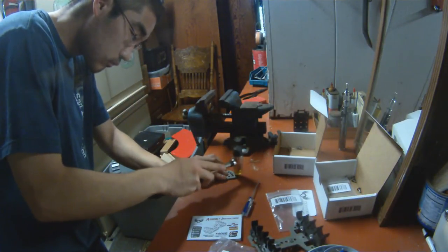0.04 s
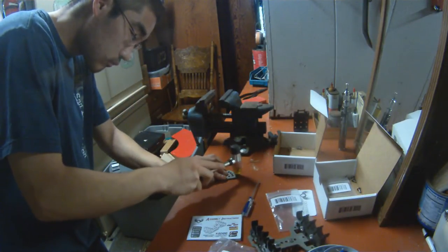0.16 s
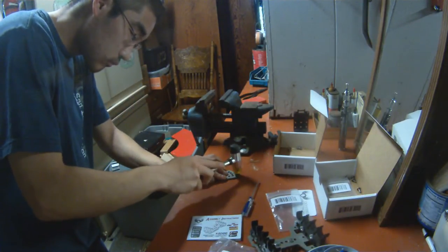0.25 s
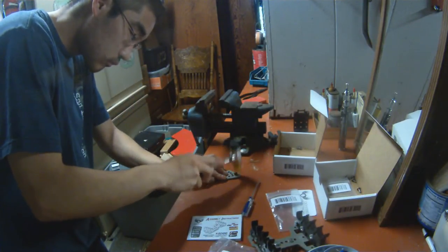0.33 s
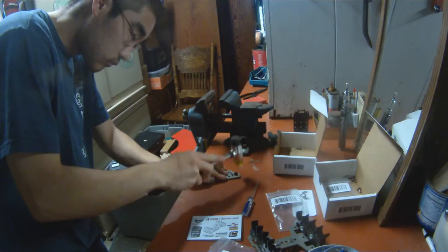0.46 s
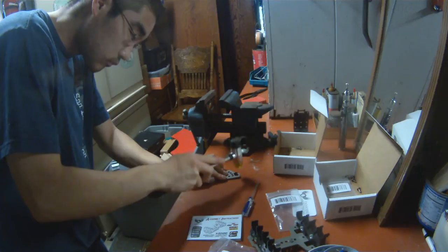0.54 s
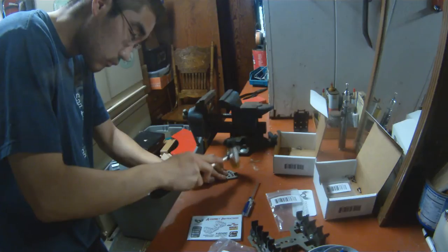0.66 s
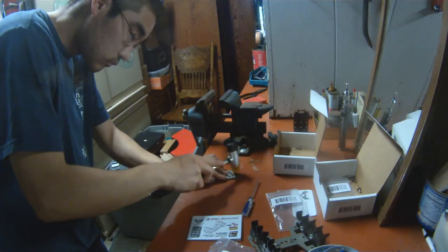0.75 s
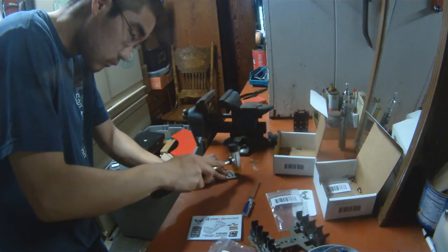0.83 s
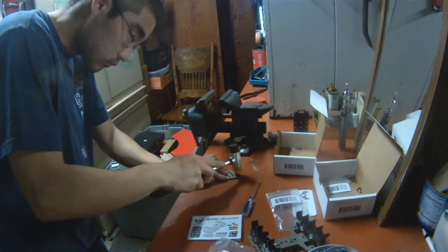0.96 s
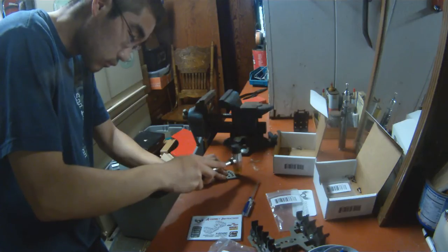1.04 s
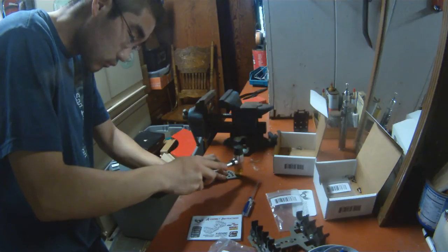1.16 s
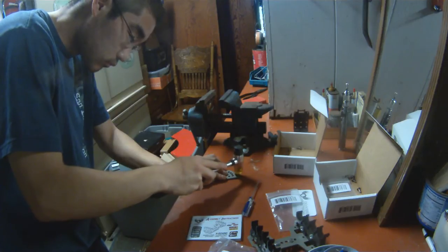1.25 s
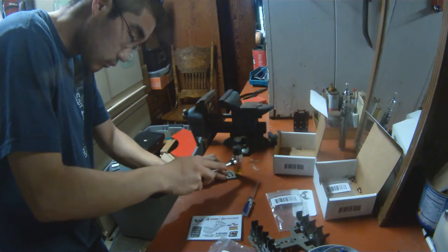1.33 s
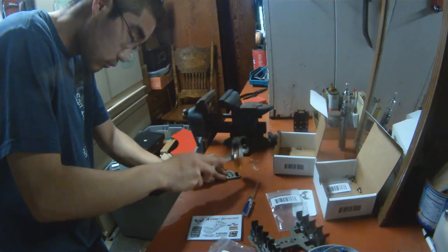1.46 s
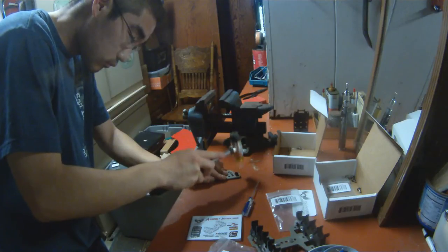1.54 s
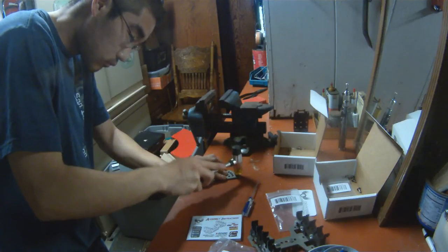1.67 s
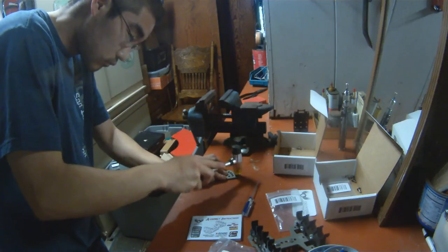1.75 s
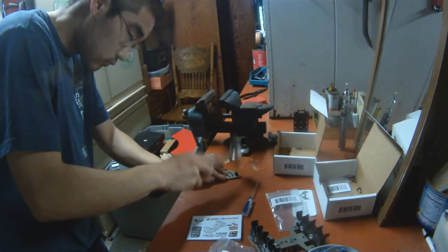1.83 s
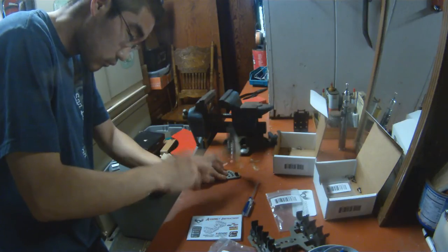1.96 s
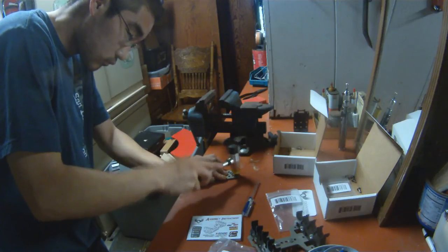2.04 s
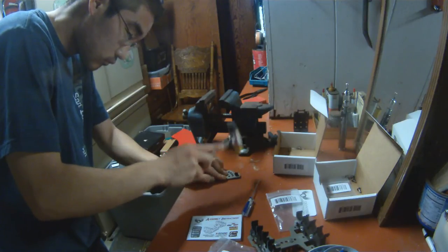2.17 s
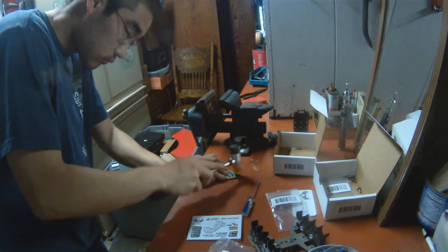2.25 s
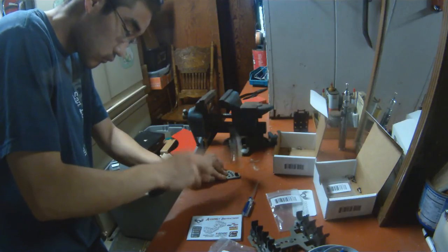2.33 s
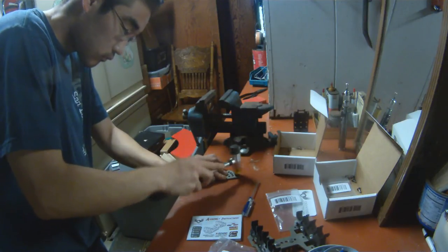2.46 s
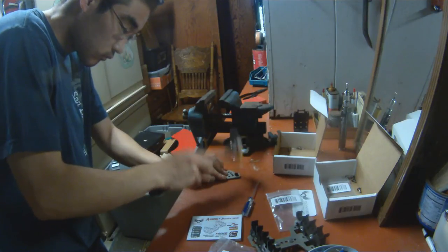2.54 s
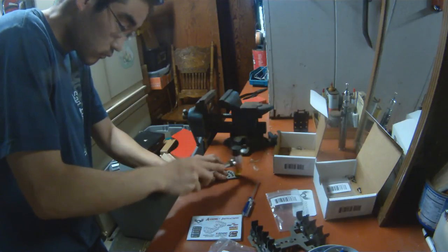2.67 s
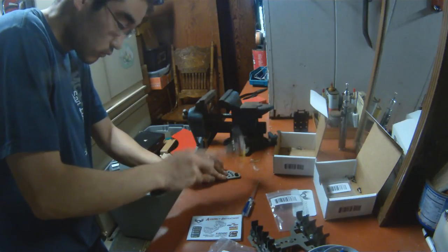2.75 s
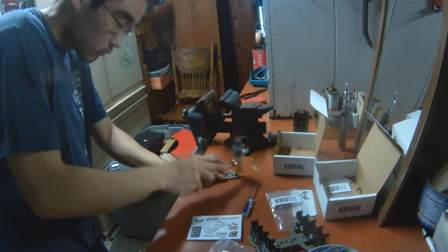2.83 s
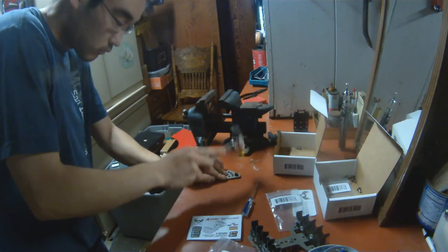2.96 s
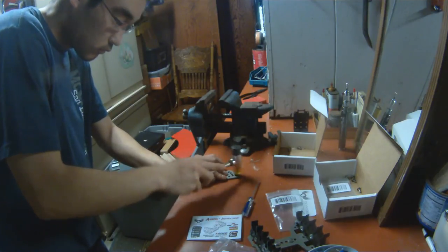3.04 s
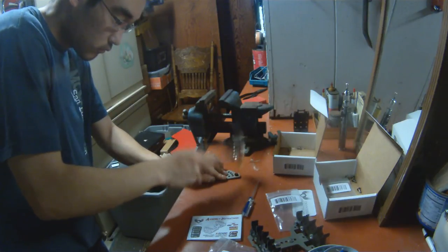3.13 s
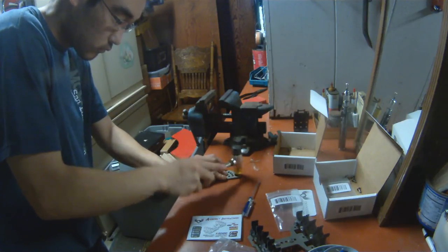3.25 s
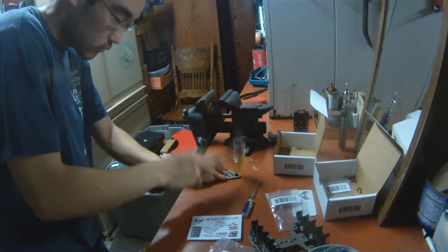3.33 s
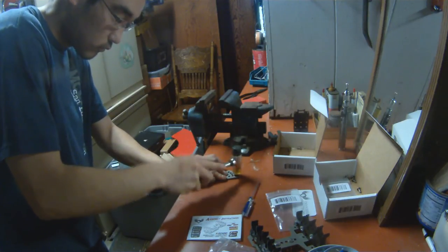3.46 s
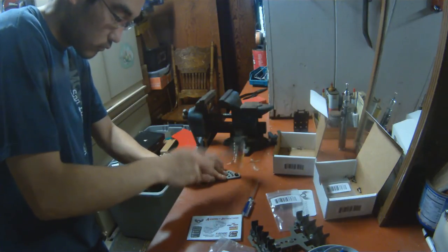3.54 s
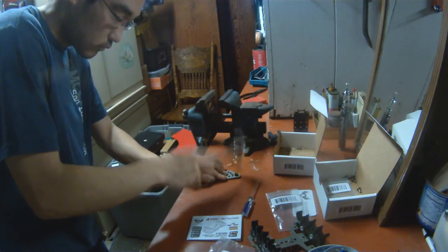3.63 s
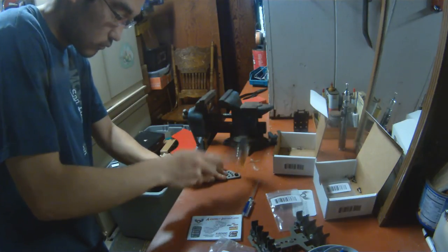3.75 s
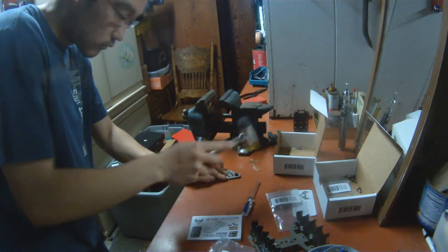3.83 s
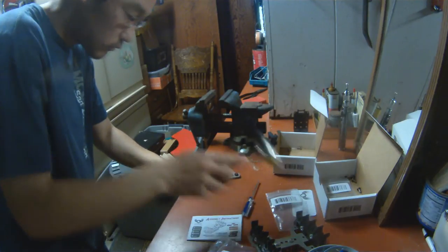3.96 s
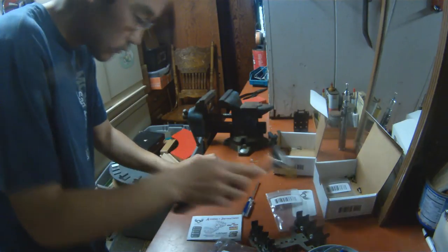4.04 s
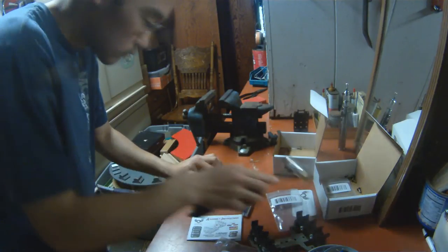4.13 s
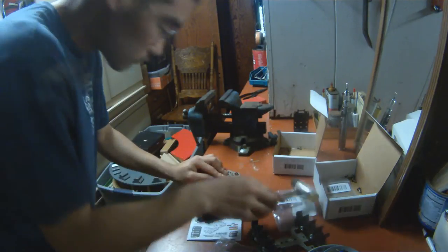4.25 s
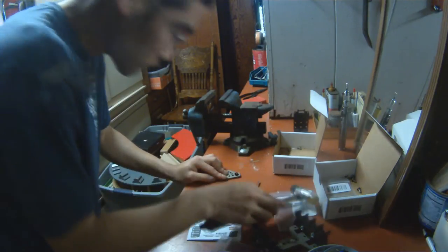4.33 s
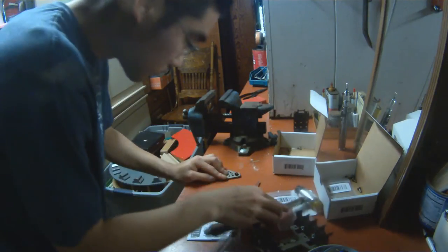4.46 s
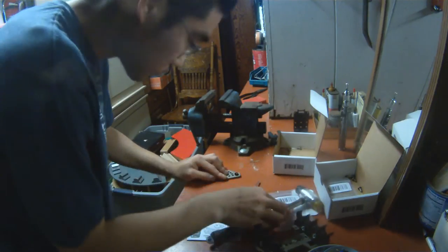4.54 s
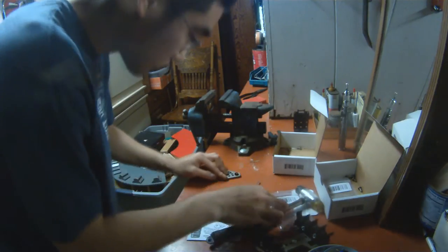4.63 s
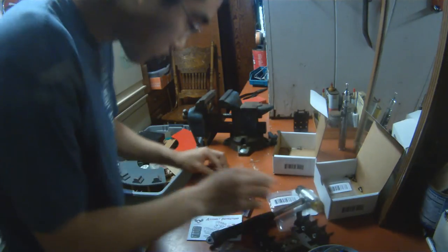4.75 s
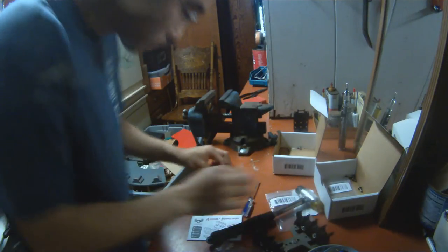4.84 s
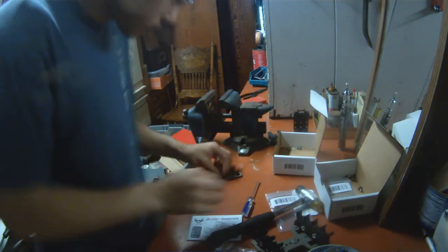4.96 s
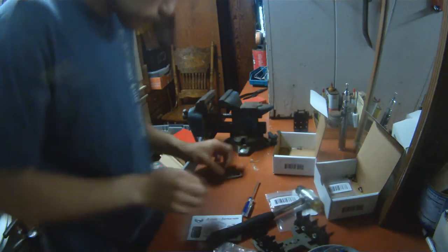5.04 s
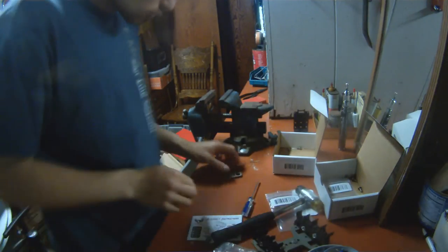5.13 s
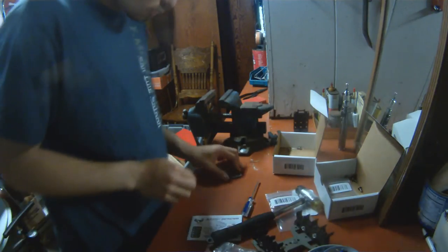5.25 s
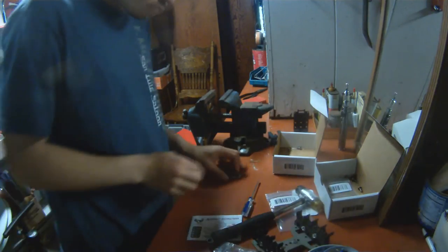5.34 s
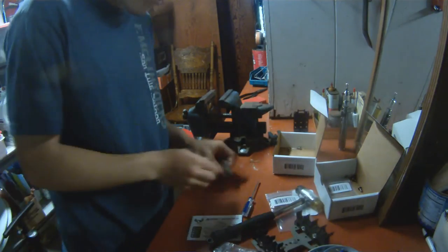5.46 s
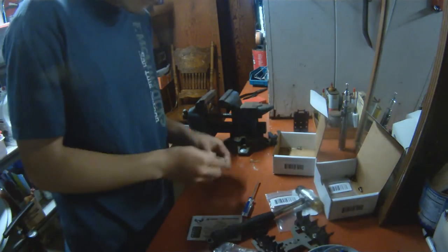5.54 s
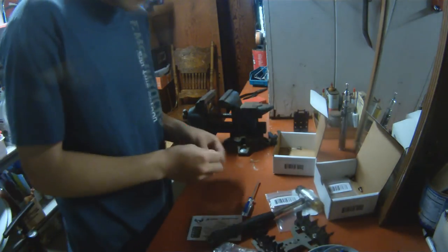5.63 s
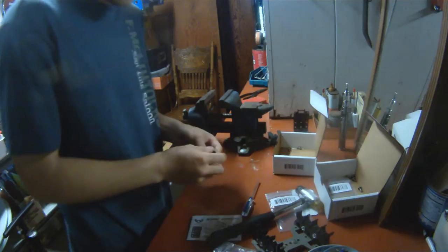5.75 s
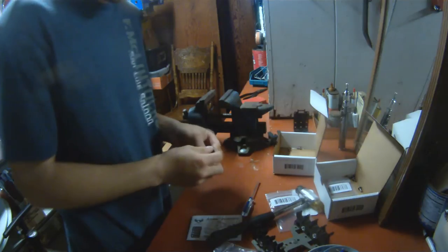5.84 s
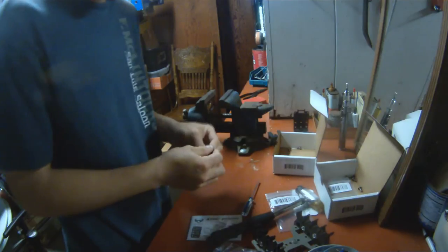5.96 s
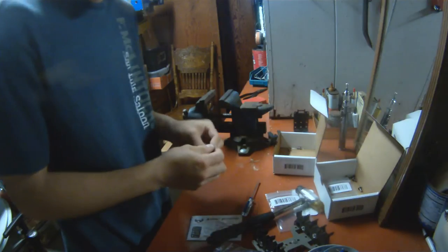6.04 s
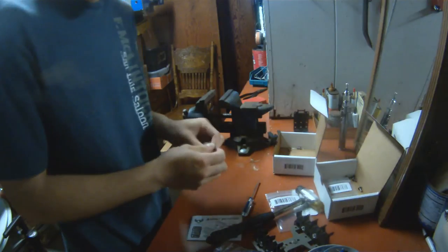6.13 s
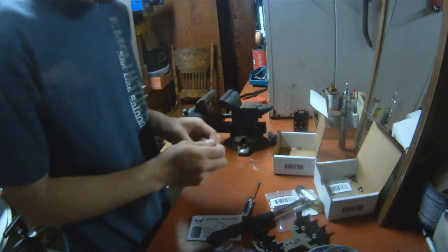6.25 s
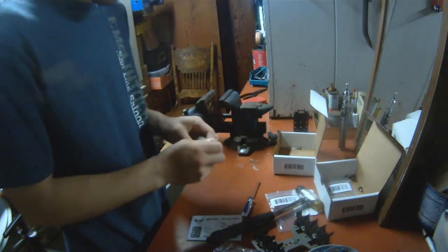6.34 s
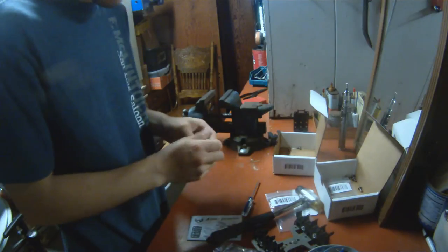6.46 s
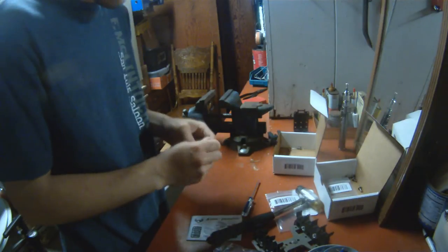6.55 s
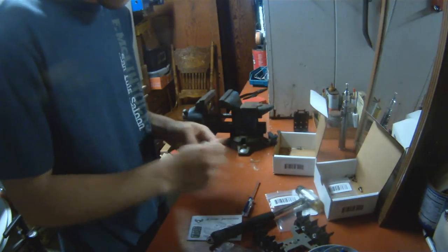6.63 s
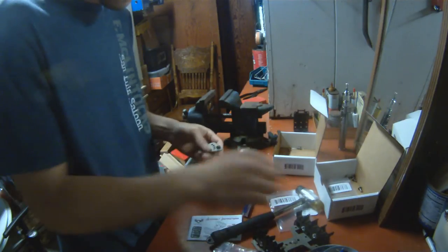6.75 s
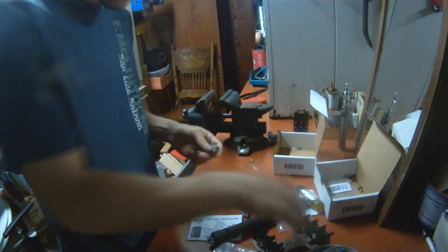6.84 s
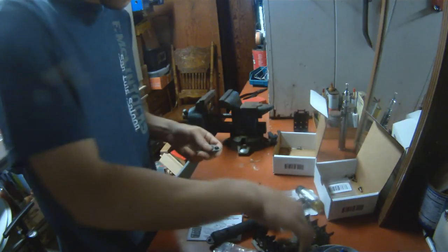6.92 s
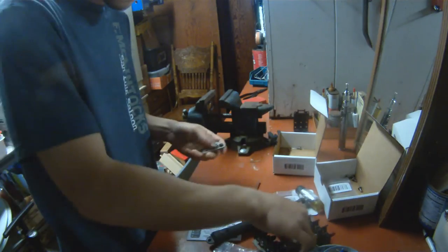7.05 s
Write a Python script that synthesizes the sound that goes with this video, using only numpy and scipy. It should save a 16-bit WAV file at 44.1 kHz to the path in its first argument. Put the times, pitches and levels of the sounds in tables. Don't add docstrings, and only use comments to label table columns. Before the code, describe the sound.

In a small, dry workshop with steady soft hiss, faint bench touches lead to two hard single hammer knocks, then a quick even run of eight. The woody thuds grow clackier as the plastic part seats. A low steel hum lingers while the hammer scrapes and bounces down on the bench, then tiny clicks in the hands and a light metal tool tap. Close stereo microphone, almost centred.

```python
import sys
import numpy as np
from scipy import signal
from scipy.fft import rfft, irfft, next_fast_len
from scipy.io import wavfile
from scipy.ndimage import uniform_filter1d

SR = 44100
rng = np.random.default_rng(int(sys.argv[2]) if len(sys.argv) > 2 else 0)


def attenuation_scalar(level_db):
    decades = np.asarray(level_db, float) / 20
    return 10 ** decades


def unload_audio(sound):
    columns = np.transpose(np.atleast_2d(sound))
    steps = np.round(np.clip(columns, -1, 1) * 32767)
    wavfile.write(sys.argv[1], SR, steps.astype(np.int16))


N = 312662

# frequency in Hz, level in dB per Hz.
AIR_SPECTRUM = [(20, -30), (50, -11), (120, -8.5), (200, -4.5), (400, -6), (700, -7), (1500, -9.5),
                (5000, -14), (15300, -20), (15500, -60)]
# frequency in Hz, level in dB per Hz.
PORT_SPECTRUM = [(12, -66.5), (20, -39), (217, -10), (377, -9), (421, -11), (511, -8.0), (1590, -9.0),
                 (15000, -12.0), (15400, -50.5)]
HISS_DB, LIMIT_DB, DUCK_DB_PER_DB, DUCK_S = -61.5, -7.5, 0.4463, 0.08
RUMBLE_DB, RUMBLE_FADE_DB_PER_S = -70, 1.1
QUIET_S, QUIET_FADE_DB_PER_S = 4.5, 2.5

# frequency in Hz, t60 in s.
ROOM_T60 = [(100, .4), (400, 0.2), (1100, 0.25), (3000, 0.17), (8000, 0.12), (15000, 0.097)]

# frequency in Hz, width in Hz, level in dB.
HANDLE_MODES = [(269, 120, -5), (410, 89, -5.5), (595, 47, -4.5), (970, 154, -14.5), (1160, 103, -17),
                (1790, 570, -21.5)]
SLIDE_S, SLIDE_DB = 4.36, -46.5
SLIDE_ATTACK_S, SLIDE_HOLD_S, SLIDE_T60_S = 0.031, 0.012, 0.17

# start in seconds, peak in dB, t60 in s.
CLICKS = [
    (5.087, -60, .065),
    (5.335, -60, .04),
    (5.455, -56.5, .08),
]
# frequency in Hz, level in dB, delay in s.
CLICK_TONES = [
    [(12400, -1, 0.00065), (7500, -2, .005), (3434, -0.5, 0), (1057, 3, 0.0033)],
    [(12500, -4, 0), (9100, -4, 0), (5460, -1, .001), (3494, -2, .001), (1480, 4.5, 0.0032)],
    [(1470, 4.5, 0), (7460, -1.5, .01), (4927, -10, .015)],
]
RISE_PER_T60 = 0.058
# frequency in Hz, level in dB, t60 in s, delay in s.
TOOL_MODES = [(1646, 0, 0.048, 0), (3784, -8, .18, .004), (2610, -8, .078, .004), (5330, -17, .11, .012),
              (1640, -12.5, .09, .023)]
TOOL_S, TOOL_DB = 7.039, -48.5
# start in seconds, peak in dB, rise in s, t60 in s, frequency in Hz.
TOOL_KNOCK = (7.047, -42, 0.0012, 0.09, 283)

# frequency in Hz, level in dB, t60 in s.
FRAME_MODES = [(96, 2, 4.64), (213, -9.5, 6.8)]
HUM_DB, HUM_DB_PER_CLACK_DB = -55, 0.7

# frequency in Hz, level in dB, t60 in s.
BENCH_MODES = [(84, -23, 0.22), (136, -7.5, 0.24), (163.2, 5, 0.27), (233, -10.5, .2), (281, -7.5, 0.17),
               (343, -5, 0.15), (369.9, 3, 0.18), (420, -5, 0.22), (511, -6, 0.21), (538, -1.5, 0.12),
               (596.2, 4.5, 0.21), (666, 2.5, 0.27), (737, -5.5, 0.19), (785, -2.5, .15), (929, -0.5, .15),
               (994.3, 2.5, 0.15), (979, -2.5, 0.13), (1125, 0, 0.098), (1030, -14.5, .13), (1253, -4, 0.1),
               (1342.5, -0.5, 0.073), (1476, -2.5, .13), (1679, -3.5, .12), (1715, -15.5, 0.078),
               (1800, -20, .12), (2024, -22, .12), (2180, -27.5, 0.075), (2330, -40, 0.033)]
# frequency in Hz, level in dB per Hz.
GRAIN_SPECTRUM = [(120, -39.5), (300, 0), (500, 1.5), (1000, -3.5), (1500, -13.5), (2200, -42)]
ZONES_HZ = [140, 480, 1150, 2100]
# frequency in Hz, level in dB, t60 in s.
DENT_MODES = [(480, 0, .014), (1000, 0, .009)]
# frequency in Hz, t60 in s.
CARTON = (499, .27)
# frequency in Hz, level in dB, t60 in s.
HEAD_MODES = [(4400, 0, .014), (5660, -7, .01), (6590, -6, .01), (7600, -5, .016), (10800, -12, .008),
              (12700, -11, .008)]
# frequency in Hz, level in dB per Hz.
CRACK_SPECTRUM = [(1500, -38), (3000, -11), (4400, -7.5), (6200, -17.5), (8000, -12.5), (13000, -18),
                  (15300, -26), (16400, -69)]
# frequency in Hz, level in dB per Hz.
PLASTIC_SPECTRUM = [(900, -39.5), (1500, -2), (2000, 8.5), (2600, -6.5), (3500, -13.5), (5000, -40)]
# frequency in Hz, level in dB per Hz.
CLATTER_SPECTRUM = [(120, -30), (200, -2), (414, -8), (681, 3.5), (834, -12), (941, -0.5), (1350, -14),
                    (2110, -8), (2920, -31.5), (5000, -30), (6500, -54), (11000, -120)]
TRAVEL_S = 0.001

# start in seconds, peak in dB, clack in dB, sharpness in dB.
TOUCHES = [
    (0.001, -48.5, -22, -22),
    (0.824, -40, -14.5, -7.5),
    (1.147, -55.5, -14, -17),
    (7.046, -46.5, -6, -16),
]
TOUCH_THUD_DB = 4.5
# start in seconds, peak in dB, clack in dB, sharpness in dB.
SETTLES = [
    (4.452, -41, -10, -22),
    (4.612, -24, -13.5, -40.5),
    (4.62, -28, -19, -45),
    (4.626, -32.5, -23, -37),
]
SETTLE_THUD_DB = -10
# start in seconds, peak in dB, thud in dB, clack in dB, edge in dB.
BOUNCES = [
    (4.463, -19, -25, -4, -0.5),
    (4.48, -18.5, -30, -6, -5.5),
    (4.49, -31, -2, -10.5, -13),
    (4.555, -19, -32, 0, -6),
    (4.566, -25, -29, -8, -3.5),
    (4.581, -23.5, -9, -11, -10),
]
BOUNCE_CRACK_DB, CRACK_DB_PER_THUD_DB = -31, -0.32
# start in seconds, peak in dB, then relative to the peak clack in dB
# (grows as the part seats), crack of the face in dB, ring of the head in dB.
BLOWS = [
    (1.725, -7, -10.5, -25, -29),
    (2.07, -3.5, -8.5, -26.5, -22),
    (2.322, -4.5, -3.5, -28.5, -27),
    (2.524, -5, -8.5, -23, -21),
    (2.722, -8, -8.5, -20, -37),
    (2.916, -4.5, -10, -22, -19),
    (3.11, -4, -2, -18.5, -21),
    (3.323, -6.5, 1.5, -25.5, -20),
    (3.529, -8, 1, -19.5, -15.5),
    (3.729, -6.5, -1, -22.5, -19.5),
]
THUD_DB, THUD_DB_PER_CLACK_DB = -21, -0.5
SLIP_S, SLIP_SPAN_S, SLIP_DB, TIGHT_DB = 2.5, 0.28, 20.5, -30


def unit(x):
    return x / np.sqrt(np.mean(x ** 2) + 1e-20)


def along(points, hz):
    f, v = np.transpose(points)
    return np.interp(np.log(hz + 1), np.log(f + 1), v)


def filtered(x, response):
    m = next_fast_len(len(x) + 8192)
    return irfft(rfft(x, m) * response(np.fft.rfftfreq(m, 1 / SR)), m)[:len(x)]


def coloured(points, size):
    return unit(filtered(rng.standard_normal(size), lambda hz: attenuation_scalar(along(points, hz))))


def add(track, s, sound):
    spot = track[round(s * SR):][:len(sound)]
    spot += sound[:len(spot)]


def sine(hz, t):
    return np.sin(2 * np.pi * hz * t)


def rise(t, rise_s):
    return 1 - np.exp(-t / rise_s)


def decay(t, t60_s):
    return attenuation_scalar(-60 * t / t60_s)


def floor():
    t = np.arange(N) / SR
    shared = attenuation_scalar(3.5) * coloured(AIR_SPECTRUM, N)
    apart = attenuation_scalar(-5.5) * coloured(PORT_SPECTRUM, N)
    low = coloured([(20, -31.5), (60, -12.5), (130, -1.0), (300, -5.5), (800, -14), (3000, -46.0)], N)
    duck_db = 0
    for s, db, *_ in BLOWS:
        duck_db = duck_db + DUCK_DB_PER_DB * max(db - LIMIT_DB, 0) * np.clip((t - s) / DUCK_S, 0, 1)
    rumble_db = RUMBLE_DB - RUMBLE_FADE_DB_PER_S * t - QUIET_FADE_DB_PER_S * np.clip(t - QUIET_S, 0, None)
    hiss = np.array([shared + apart, shared - apart]) * attenuation_scalar([[-0.15], [0.15]])
    return attenuation_scalar(HISS_DB - duck_db) * hiss + attenuation_scalar(rumble_db) * low


def room_tail():
    hz, t, z = signal.stft(rng.standard_normal(SR // 2), SR, nperseg=256)
    x = signal.istft(z * decay(t, along(ROOM_T60, hz)[:, None]), SR, nperseg=256)[1]
    return x / np.linalg.norm(x)


def scrape():
    noise = rng.standard_normal(N)
    swell = unit(uniform_filter1d(rng.standard_normal(N), size=90))
    grains = noise * attenuation_scalar(2.5 * swell)

    def handle(f):
        total = 0
        for k, (hz, width_hz, db) in enumerate(HANDLE_MODES):
            damping = 1j * f * width_hz
            total = total + (-1) ** k * attenuation_scalar(db) * damping / (hz * hz - f * f + damping)
        return total

    t = np.arange(N) / SR - SLIDE_S
    attack = np.clip(t / SLIDE_ATTACK_S, 0, 1)
    after_s = np.clip(t - SLIDE_ATTACK_S - SLIDE_HOLD_S, 0, None)
    return attack * attenuation_scalar(SLIDE_DB) * decay(after_s, SLIDE_T60_S) * unit(filtered(grains, handle))


def rub(rows, drift_rad, puff_db):
    out, t = np.zeros(N), np.arange(SR // 4) / SR
    for s, db, rise_s, t60_s, hz in rows:
        drift = np.cumsum(rng.standard_normal(len(t))) * drift_rad
        spectrum = [(hz / 3, -20), (hz, 0), (hz * 2.6, -14), (hz * 5, -40)]
        puff = attenuation_scalar(puff_db) * coloured(spectrum, len(t))
        tone = np.sin(2 * np.pi * hz * t + drift)
        add(out, s, attenuation_scalar(db + 2.5) * decay(t, t60_s) * rise(t, rise_s) * (tone + puff))
    return out


def hand_clicks():
    rows = []
    for (s, db, t60_s), tones in zip(CLICKS, CLICK_TONES):
        rows += [(s + late_s, db + g, RISE_PER_T60 * t60_s, t60_s, hz) for hz, g, late_s in tones]
    return rub(rows, drift_rad=0.05, puff_db=-2)


def steel_tool():
    rows = [(TOOL_S + late_s, TOOL_DB + g, RISE_PER_T60 * t60_s, t60_s, hz)
            for hz, g, t60_s, late_s in TOOL_MODES]
    return rub(rows + [TOOL_KNOCK], drift_rad=0.01, puff_db=-18)


def frame_hum():
    t = np.arange(N) / SR
    s, _, clack = np.transpose(BLOWS)[:3]
    db = HUM_DB + HUM_DB_PER_CLACK_DB * clack
    last = np.clip(np.searchsorted(s, t) - 1, 0, None)
    out = 0
    for hz, level, t60_s in FRAME_MODES:
        gain = (t > s[0]) * attenuation_scalar(db[last] + level) * decay(t - s[last], t60_s)
        out = out + uniform_filter1d(gain, size=400) * np.sqrt(2) * sine(hz, t)
    return out


def bench_body(t, thud, clack, edge, press_db, press_s, scatter_db):
    hz, level, t60_s = np.transpose(BENCH_MODES)[..., None]
    sign = -(-1) ** (np.arange(len(hz))[:, None] // 3)
    t60_s = np.minimum(t60_s, np.where(hz > 560, 0.18, 0.25))
    colour = along(np.transpose([ZONES_HZ, [thud + 12, 0, clack + 3, edge + 18]]), hz)
    gains = attenuation_scalar(level + colour + scatter_db * rng.standard_normal(hz.shape))
    wander = 0.002 * np.sqrt(hz) * np.cumsum(rng.standard_normal((len(hz), len(t))), axis=1)
    press = np.exp(-(t / press_s) ** 2)
    fade = decay(t, t60_s) + attenuation_scalar(press_db) * press
    modes = np.sum(sign * gains * fade * np.sin(2 * np.pi * hz * t + wander), axis=0)
    tilted = [(f, g + (f > 800) * clack) for f, g in GRAIN_SPECTRUM]
    grain = coloured(tilted, len(t)) * (decay(t, 0.2) + attenuation_scalar(press_db - 7) * press)
    return modes * rise(t, 0.0025) + attenuation_scalar(3.5) * grain * rise(t, 0.002)


def post_dent(t, clack):
    dent = -sum(attenuation_scalar(g + (f > 800) * clack) * decay(t, t60_s) * sine(f, t) for f, g, t60_s in DENT_MODES)
    return dent * rise(t, 0.0002)


def carton(t):
    hz, t60_s = CARTON
    return decay(t, t60_s) * sine(hz, t) * rise(t, 0.009)


def part_chatter(t, spectrum):
    return coloured(spectrum, len(t)) * (decay(t, 0.037) + attenuation_scalar(-15) * decay(t, 0.18)) * rise(t, 0.0005)


def head_ring(t, crack, ping):
    hz, level, t60_s = np.transpose(HEAD_MODES)[..., None]
    db = np.where(hz < 5000, ping, crack) + level + 2 * rng.standard_normal(hz.shape)
    return np.sum(attenuation_scalar(db) * decay(t, t60_s) * sine(hz, t), axis=0)


def face_crack(t):
    return coloured(CRACK_SPECTRUM, len(t)) * (decay(t, 0.01187) + attenuation_scalar(-19) * decay(t, 0.06))


def knocks(rows, rattle, body_db, dent_db, box_db, chatter_db, crack_db, ring_db,
           press_db, press_s, scatter_db, wet_db):
    out, t = np.zeros(N), np.arange(SR // 2) / SR
    walls = room_tail()
    for s, db, thud, clack, edge, crack, ping in rows:
        body = bench_body(t, thud, clack, edge, press_db, press_s, scatter_db)
        wood = attenuation_scalar(body_db) * body + attenuation_scalar(dent_db) * post_dent(t, clack)
        chatter = attenuation_scalar(edge + chatter_db) * part_chatter(t, rattle)
        close = attenuation_scalar(db) * (attenuation_scalar(box_db) * carton(t) + attenuation_scalar(ring_db) * head_ring(t, crack, ping))
        burst = attenuation_scalar(crack + crack_db) * face_crack(t)
        spread = attenuation_scalar(db) * (wood + chatter + burst)
        answer = 0.87 * walls + 0.5 * room_tail()
        add(out, s + TRAVEL_S, spread + close)
        add(out, s + 0.01, attenuation_scalar(wet_db) * signal.fftconvolve(spread * decay(t, 0.06), answer))
    return out


def soft_bumps():
    rows = []
    for contacts, thud in ((TOUCHES, TOUCH_THUD_DB), (SETTLES, SETTLE_THUD_DB)):
        rows += [(s, db, thud, clack, sharp, sharp, sharp) for s, db, clack, sharp in contacts]
    return knocks(rows, PLASTIC_SPECTRUM, body_db=-27, dent_db=-9, box_db=-54, chatter_db=-8, crack_db=-1.5,
                  ring_db=-17, press_db=9, press_s=0.01, scatter_db=7.0, wet_db=-7)


def hammer_bounces():
    rows = []
    for s, db, thud, clack, edge in BOUNCES:
        crack = BOUNCE_CRACK_DB + CRACK_DB_PER_THUD_DB * thud
        rows.append((s, db, thud, clack, edge, crack, crack))
    return knocks(rows, CLATTER_SPECTRUM, body_db=-34, dent_db=-3.0, box_db=-43, chatter_db=-2, crack_db=-7,
                  ring_db=1, press_db=12.0, press_s=0.0036, scatter_db=5.5, wet_db=-11.0)


def hammer_blows():
    rows = []
    for s, db, clack, crack, ring in BLOWS:
        thud = THUD_DB + THUD_DB_PER_CLACK_DB * clack
        edge = TIGHT_DB + SLIP_DB * np.exp(-((s - SLIP_S) / SLIP_SPAN_S) ** 2)
        rows.append((s, db, thud, clack, edge, crack, ring))
    return knocks(rows, PLASTIC_SPECTRUM, body_db=-28.5, dent_db=4, box_db=-18.5, chatter_db=-1.5, crack_db=1,
                  ring_db=1.5, press_db=13, press_s=0.013, scatter_db=1.5, wet_db=-9.0)


def scene():
    low_cut = signal.butter(8, 78, "high", fs=SR, output="sos")
    high_cut = signal.butter(12, 15700, fs=SR, output="sos")
    bench = hammer_blows() + soft_bumps() + hammer_bounces()
    bench = bench + hand_clicks() + steel_tool() + frame_hum() + scrape()
    bench = signal.sosfilt(np.vstack([low_cut, high_cut]), bench)
    return bench * attenuation_scalar([[-0.22], [0.22]]) + floor()


def band_limit(x):
    return signal.sosfilt(signal.butter(12, 16530, fs=SR, output="sos"), x)


def record(dry):
    rounded = dry / (1 + np.abs(dry / 0.8) ** 4) ** (1 / 4)
    return band_limit(rounded)


dry = scene()
out = record(dry)
unload_audio(out)
```